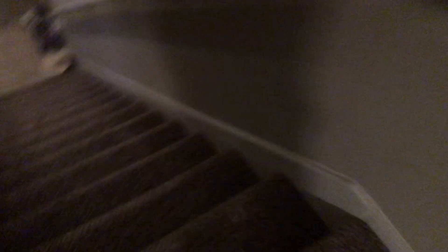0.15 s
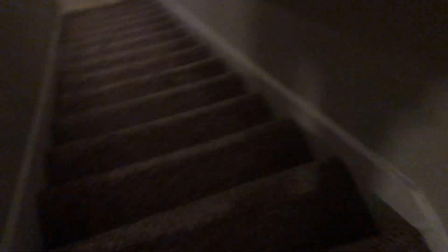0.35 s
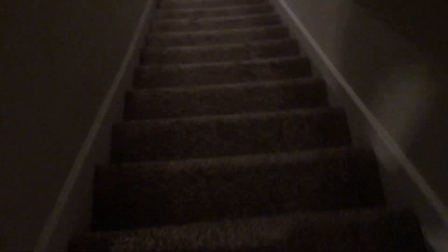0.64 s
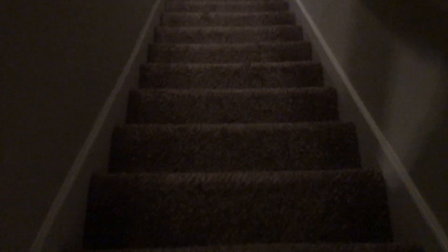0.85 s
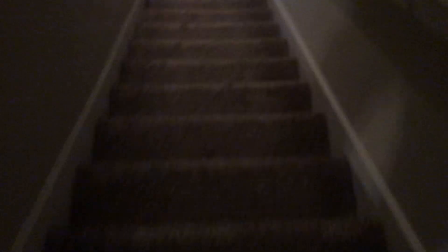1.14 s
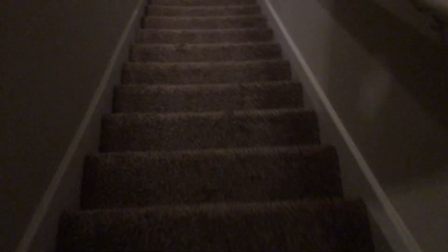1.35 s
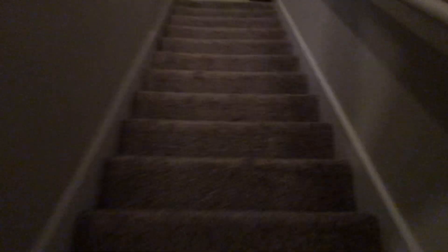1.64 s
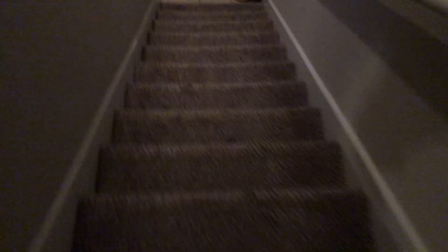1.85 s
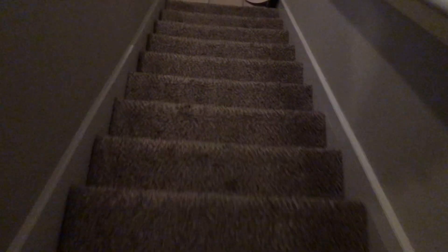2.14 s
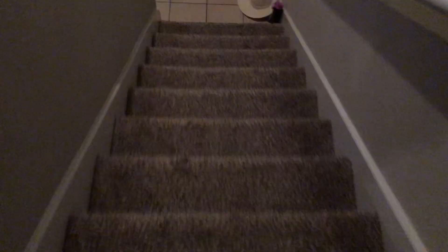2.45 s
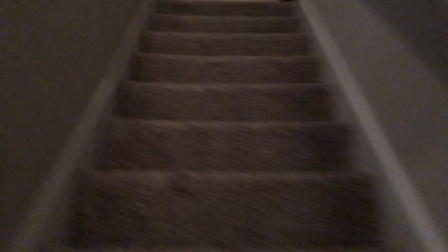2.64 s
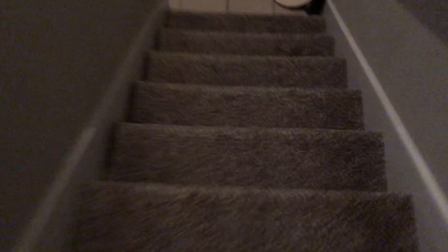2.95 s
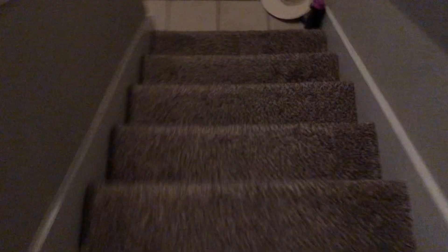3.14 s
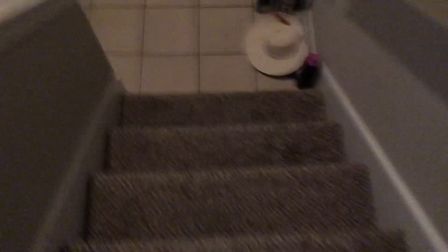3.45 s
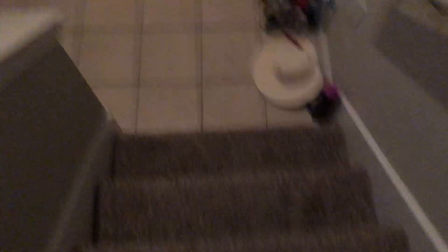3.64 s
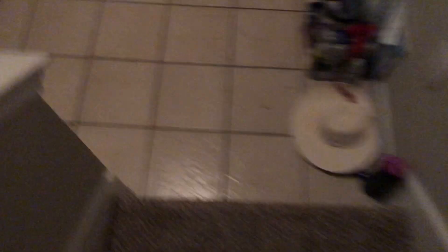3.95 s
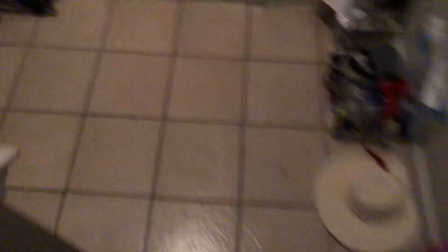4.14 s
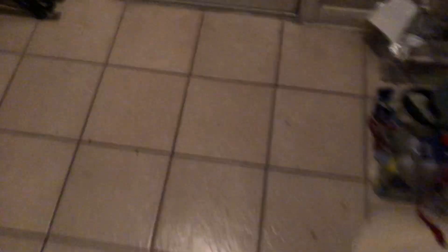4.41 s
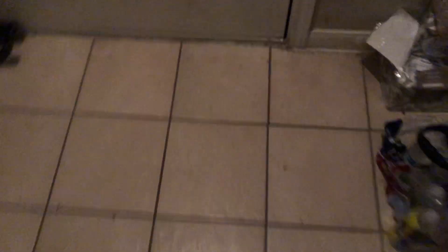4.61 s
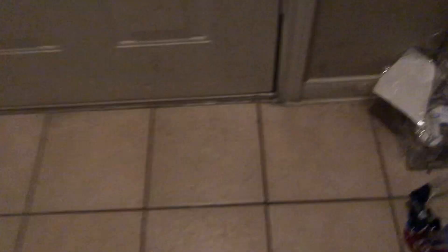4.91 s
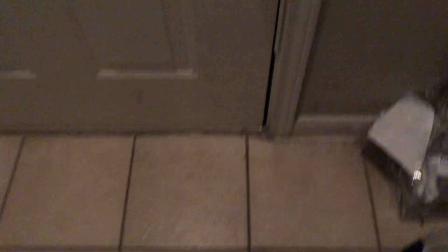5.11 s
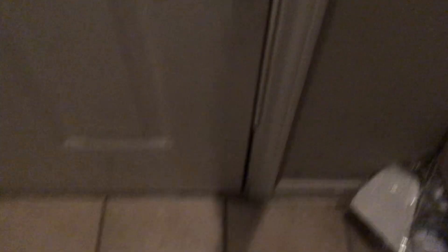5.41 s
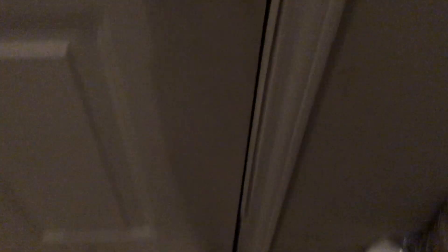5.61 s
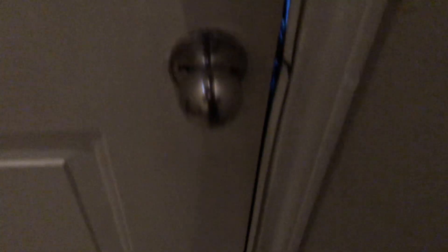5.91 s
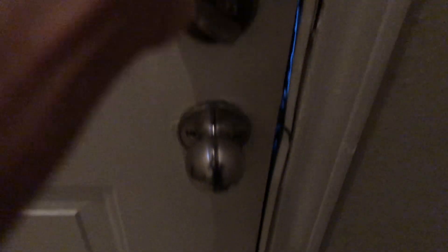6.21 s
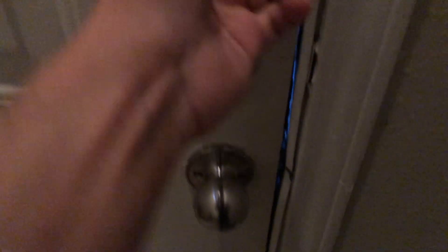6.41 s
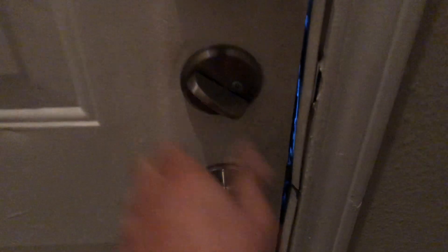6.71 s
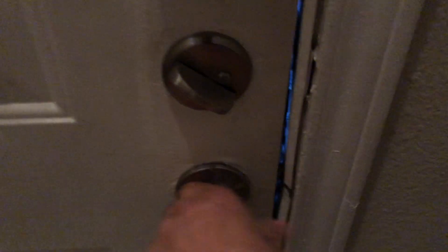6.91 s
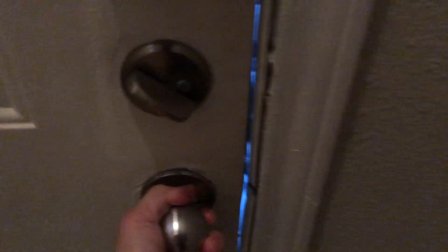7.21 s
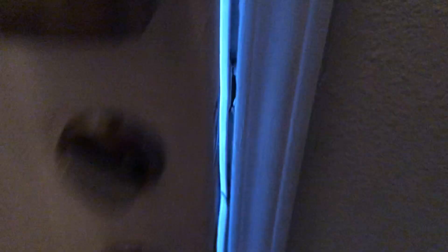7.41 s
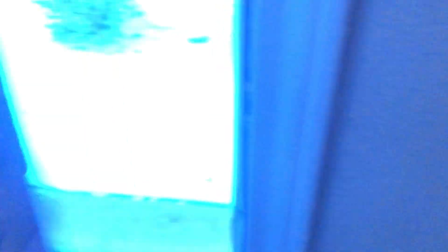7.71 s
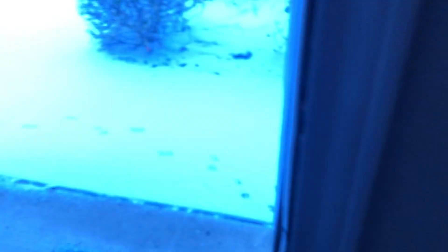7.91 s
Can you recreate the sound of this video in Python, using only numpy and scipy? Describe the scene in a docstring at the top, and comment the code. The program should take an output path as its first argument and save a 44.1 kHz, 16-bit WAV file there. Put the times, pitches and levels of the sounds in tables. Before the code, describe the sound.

Faint indoor air and a fading drone sit under soft steps that grow heavier down carpeted stairs, with hollow low thumps, dull knocks and fabric rustle. The steps turn drier on tile and stop. A hand turns a bolt and knob in crisp clicks; the door jerks loose, by far the loudest moment, crackling and shuddering, then squeaks as it swings. Close microphone, small reverberant hall.

```python
"""Someone walks down carpeted wooden stairs into a tiled hall: treads boom and knock, soles scuff, clothes swish.
Then a deadbolt and knob click, and the front door jerks out of its seal, shudders, squeaks and creaks open.
Wood is swinging sines and dull noise knocks; soles and cloth are coloured noise; metal is brief noise bursts
through lock resonances; seal and hinge are uneven slips through resonances. The hall adds diffuse echoes,
over still indoor air and a fading drone."""
import sys
import numpy as np
from scipy import signal
from scipy.io import wavfile

SR = 44100
rng = np.random.default_rng(int(sys.argv[2]) if len(sys.argv) > 2 else 0)


def put_to_file(sound):
    """Save the sound as 16-bit audio at rate SR, in the file named by the first command-line argument."""
    columns = np.atleast_2d(sound).T  # one column per channel
    safe = np.clip(columns, -1, 1)
    whole_steps = np.round(safe * 32767)
    wavfile.write(sys.argv[1], SR, whole_steps.astype(np.int16))


N = 355446
TIME = np.arange(N) / SR   # s
CUTOFF_HZ = 16200   # top of the recorded band


def from_db(db):
    """Decibels to amplitude."""
    return 10 ** (np.asarray(db) / 20)


def rms_one(x):
    """Scale to an rms of 1."""
    return x / np.sqrt(np.mean(x ** 2) + 1e-20)


def in_time(rows):
    """Columns of a table joined by straight lines over time."""
    s, *columns = np.transpose(rows)
    return [np.interp(TIME, s, column) for column in columns]


def at_hz(points, hz):
    """A spectrum read on a log-frequency axis."""
    point_hz, values = np.array(points).T
    return np.interp(np.log(hz), np.log(point_hz), values)


def add(out, s, sound):
    """Mix a sound in at a given time."""
    start = int(np.clip(s * SR, 0, N - 1))
    out[start:start + len(sound)] += sound[:N - start]


def band(x, low_hz, high_hz):
    """Band-pass."""
    top = min(max(high_hz, low_hz * 1.1), .45 * SR)
    return signal.sosfilt(signal.butter(2, [low_hz, top], "band", fs=SR, output="sos"), x)


def resonate(x, hz, width_hz):
    """One resonance with gain of about 1 at its peak."""
    r = np.exp(-np.pi * width_hz / SR)
    zeros = np.array([1, 0, -1]) * (1 - r * r) / 2
    poles = [1, -2 * r * np.cos(2 * np.pi * hz / SR), r * r]
    return signal.lfilter(zeros, poles, x + 1e-18)


def drift(rate, size):
    """Random values, rate per second, joined by straight lines."""
    knots = rng.standard_normal(4096)
    return np.interp(TIME[:size] * rate, np.arange(len(knots)), knots)


def noise(spectrum, size, t60s=None, patchy_db=0):
    """Half-octave bands of noise, rms 1 at the start; each band may flicker or die at its own rate."""
    white = rng.standard_normal((2, size))   # neighbouring bands take different noise
    edges = 24 * 2 ** np.arange(0, 9.6, .5)   # Hz
    out, power = 0, 0
    for k, (low, high) in enumerate(zip(edges, edges[1:])):
        hz = np.sqrt(low * high)
        level = from_db(at_hz(spectrum, hz)) * np.sqrt(high - low)
        if t60s:
            change_db = -60 * TIME[:size] / at_hz(t60s, hz)
        else:
            change_db = patchy_db * drift(25, size)
        out = out + level * rms_one(band(white[k % 2], low, high)) * from_db(change_db)
        power += level ** 2
    return out / np.sqrt(power)


def contact(low_hz, high_hz, decay_s):
    """A brief contact builds, chatters and dies, with rms about 1 near its start."""
    t = TIME[:SR // 4]
    envelope = np.exp(-t / decay_s) * (1 - np.exp(-t / 0.00055))
    envelope = envelope * from_db(2.2 * drift(850, len(t)))
    burst = band(rng.standard_normal(len(t)) * envelope + 1e-18, low_hz, high_hz)
    return burst * np.sqrt(decay_s * SR / 2 / np.sum(burst ** 2))


def contacts(rows):
    """A run of brief contacts, each in its own band."""
    out = np.zeros(N)
    for s, db, low_hz, high_hz, decay_s in rows:
        add(out, s, from_db(db) * contact(low_hz, high_hz, decay_s))
    return out


def flexing(rows):
    """A wide wooden panel, loaded softly, swings at a low pitch under an even swell and fade."""
    out = np.zeros(N)
    for s, db, hz, half_s in rows:
        near = np.abs(TIME - s) < 4 * half_s
        t = TIME[near] - s
        swell = np.exp(-(t / half_s) ** 2)
        out[near] += from_db(db) * swell * np.cos(2 * np.pi * hz * t)
    return out


def wood_knocks(rows, ring=0., crack_db=-11.5):
    """Struck wood knocks dully around one pitch, partly as a clear ring, with a faint crack on top."""
    out, t = np.zeros(N), TIME[:SR // 4]
    for s, db, hz, decay_s in rows:
        tone = np.sqrt(2) * np.sin(2 * np.pi * hz * t) * np.exp(-t / decay_s)
        dull = contact(hz / 1.79, hz * 1.18, decay_s)
        body = np.sqrt(1 - ring) * dull + np.sqrt(ring) * tone   # ring = share of power in the tone
        crack = contact(hz, hz * 2.35, 0.0043)
        add(out, s, from_db(db) * (body + from_db(crack_db) * crack))
    return out


def footfall_booms():
    """Treads and floor swing under each footfall and rebound."""
    # (time of crest [s], peak [dB], pitch [Hz], half length [s])
    footfall_rows = [(.03, -50.5, 69, 0.074), (.61, -50, 62, 0.017), (1.39, -48, 89, 0.0068),
                     (1.61, -51.5, 72.5, .021), (1.972, -26, 55, 0.021), (2.135, -42, 56.3, 0.011),
                     (2.24, -41.5, 55, 0.027), (2.425, -35, 58, .038), (2.50, -39, 57, 0.015),
                     (2.565, -42, 62, 0.0085), (2.68, -37.5, 57, 0.059), (2.755, -29.5, 53, 0.018),
                     (2.91, -33, 53, 0.019), (3.098, -27.5, 72.4, 0.016), (3.138, -30.5, 63.4, 0.031),
                     (3.215, -36.5, 49.4, 0.034), (3.33, -37, 55.3, 0.039), (3.42, -42, 48, 0.04),
                     (3.765, -34.5, 73, 0.0061), (3.83, -42, 60.4, 0.027), (3.972, -32, 73.5, 0.026),
                     (4.04, -36.5, 76.5, 0.0077), (4.17, -43, 76.5, 0.021), (4.24, -45, 66.4, 0.043)]
    return flexing(footfall_rows)


def tread_knocks():
    """Treads and feet knock; the lower a knock, the more wood moves and the longer it rings."""
    # (time [s], level [dB], pitch [Hz])
    knock_rows = [(1.447, -42.5, 312), (2.221, -37, 527), (2.366, -42, 238), (2.447, -36, 474),
                  (2.467, -44, 765), (2.539, -38, 390), (2.6099, -41.5, 725), (2.635, -43, 248),
                  (2.657, -38, 147), (2.836, -45, 245), (3.004, -40, 607), (3.042, -39, 460),
                  (3.072, -36.5, 157), (3.132, -41, 403), (3.316, -43, 490), (3.352, -36.5, 383),
                  (3.701, -51, 437), (3.736, -43.5, 287), (3.75, -40.5, 139), (3.804, -39.5, 3300),
                  (3.806, -33.5, 1160), (3.807, -35.5, 467), (3.977, -37.5, 1410), (3.956, -40, 142),
                  (3.978, -62, 252), (4.003, -39.5, 755), (4.072, -43.5, 2880), (4.096, -40, 840),
                  (4.16, -39, 154), (4.394, -41, 169.5), (4.426, -41, 880), (4.426, -40.5, 1600),
                  (4.988, -46, 1200), (5.049, -46.5, 660), (5.338, -53, 1210)]
    decay_s, pitch_hz, damping = 0.0047, 500, 0.77   # decay at this pitch, and the power by which it shortens
    rows = [(s, db, hz, decay_s * (pitch_hz / hz) ** damping) for s, db, hz in knock_rows]
    return wood_knocks(rows, ring=.6)


def sole_brushes():
    """Soles brush over carpet and tile in brief bands of noise."""
    # (time [s], level [dB], lowest [Hz], highest [Hz], decay [s])
    brush_rows = [(.408, -58.5, 1090, 3200, 0.068), (3.003, -56, 900, 2800, 0.0067),
                  (3.075, -54.5, 650, 2200, .03), (3.305, -53, 800, 1930, 0.047),
                  (3.812, -49.5, 450, 2800, 0.036), (4.82, -56, 500, 1850, 0.018),
                  (4.925, -58, 2400, 4300, 0.009), (4.988, -50, 850, 4370, 0.026)]
    return contacts(brush_rows)


def on_tile(soles):
    """Hollow treads boom under a scuff; on the solid tiled floor the soles lose their rumble."""
    tile_from_s, tile_cut_hz = 4.55, 260
    tiled = np.clip((TIME - tile_from_s) / .1, 0, 1)
    return (1 - tiled) * soles + tiled * band(soles, tile_cut_hz, CUTOFF_HZ)


def rubbing():
    """Over a steady rub, each scuff bites quickly and fades; each swish swells and falls evenly."""
    # steady rub under the strides, as briskly as the walker moves: (time [s], soles [dB], cloth [dB])
    pace = [(0, -58, -70), (.85, -82, -73), (1.75, -65, -67.5), (2.4, -56.5, -65), (3.1, -56, -62),
            (4.15, -51, -62.5), (4.6, -70, -65.5), (5.5, -64.5, -68), (5.75, -94, -77), (8.06, -85, -81)]
    # a sole lands and slides over the carpet: (time of crest [s], level [dB], fade [s])
    scuff_rows = [(.01, -55.5, 0.053), (.63, -55.5, .08), (1.05, -56.5, 0.079), (1.29, -54.5, 0.11),
                  (1.47, -56.5, 0.067), (1.61, -51.5, 0.031), (1.893, -43.5, 0.04), (2.11, -51, 0.12),
                  (2.24, -54, 0.058), (2.365, -51, 0.024), (2.46, -47, 0.055), (2.845, -48, 0.088),
                  (3.02, -48.5, 0.37), (3.281, -44.5, 0.12), (3.342, -40, 0.036), (3.61, -49.5, 0.017),
                  (3.816, -48.5, 0.067), (3.97, -48.5, 0.065), (4.14, -57, 0.71), (4.425, -48, 0.073),
                  (4.66, -52.5, 0.074), (4.84, -51, 0.062), (5.011, -55, 0.086)]
    # cloth swishes as a leg or arm swings past: (time of crest [s], level [dB], half length [s])
    swish_rows = [(0.08, -62, 0.053), (1.288, -58, 0.053), (1.46, -67, 0.02), (1.62, -62, 0.046),
                  (1.89, -57.5, 0.045), (2.203, -62, 0.073), (2.406, -60, 0.059), (2.67, -63.5, 0.058),
                  (2.878, -57.5, 0.055), (3.09, -60, 0.056), (3.317, -55.5, 0.045), (3.617, -61, 0.027),
                  (3.746, -57, 0.023), (3.936, -57, 0.037), (4.193, -59.5, 0.066), (4.46, -62, 0.057),
                  (4.792, -60.5, 0.025), (5.028, -55.5, 0.029), (5.394, -57.5, 0.037), (5.6, -66, 0.063),
                  (5.89, -61, 0.061), (6.18, -69, 0.077), (6.623, -67.5, 0.019), (6.93, -63.5, 0.062),
                  (7.254, -53, 0.14), (7.5, -57, 0.16), (7.695, -51.5, 0.019), (7.807, -61.5, 0.038)]
    # colour of soles on the floor: (frequency [Hz], density [dB per Hz])
    sole_colour = [(60, 4), (150, 1), (230, 0.5), (360, -3), (700, -9), (1300, -17.5), (2500, -25.5),
                   (5000, -27), (12000, -81)]
    # colour of cloth on cloth: (frequency [Hz], density [dB per Hz])
    cloth_colour = [(300, 1), (1000, -3), (2500, -2.5), (5000, -3.5), (9000, -6), (15000, -7)]
    scuff_rise_s = 0.028
    swish_shape = 3   # 1 = pointed crest, 2 = bell, higher = flatter top
    sole_power, cloth_power = from_db(in_time(pace)) ** 2
    for s, db, fade_s in scuff_rows:
        near = np.abs(TIME - s) < 1
        t = TIME[near] - s
        bite = np.exp(-np.maximum(t / fade_s, -t / scuff_rise_s))
        sole_power[near] += (from_db(db) * bite) ** 2
    for s, db, half_s in swish_rows:
        near = np.abs(TIME - s) < 4 * half_s
        swell = np.exp(-np.abs((TIME[near] - s) / half_s) ** swish_shape)
        cloth_power[near] += from_db(db) ** 2 * swell
    soles = np.sqrt(sole_power) * noise(sole_colour, N, patchy_db=1.8)
    cloth = np.sqrt(cloth_power) * noise(cloth_colour, N, patchy_db=2.0)
    # fine grain in the level of both
    return on_tile(soles) * from_db(1.8 * drift(200, N)) + cloth * from_db(1.9 * drift(300, N))


def chirps():
    """Soles, cloth and rubber chirp as they slide, each in a gliding band of noise."""
    # (time [s], length [s], start [Hz], end [Hz], width [Hz], level [dB])
    chirp_rows = [(3.017, 0.045, 5930, 4400, 180, -60), (3.044, 0.053, 3930, 3180, 350, -63),
                  (3.037, .065, 2500, 1940, 400, -65), (3.551, 0.08, 2140, 3540, 453, -58),
                  (3.554, 0.059, 1750, 1640, 300, -58), (4.91, 0.042, 2220, 2520, 200, -58),
                  (5.2, 0.045, 2390, 2310, 71, -64.5), (5.23, .16, 2380, 2390, 30, -77),
                  (7.307, 0.025, 5320, 2850, 1080, -37), (7.334, .018, 2090, 527, 444, -29)]
    out = np.zeros(N)
    for s, length, start_hz, end_hz, width_hz, db in chirp_rows:
        size = int(length * SR)
        phase = 2 * np.pi * np.cumsum(np.geomspace(start_hz, end_hz, size)) / SR
        voice = drift(width_hz, size) * np.sin(phase) + drift(width_hz, size) * np.cos(phase)
        add(out, s, from_db(db) * np.hanning(size) * voice)
    return out


def lock():
    """Bolt, knob and latch click; each contact rings the lock case."""
    # metal contacts: (time [s], level [dB], lowest [Hz], highest [Hz], decay [s])
    click_rows = [(5.820, -49.5, 400, 4000, 0.012), (5.847, -38.5, 500, 15500, 0.0028),
                  (5.8995, -37.5, 1460, 11600, 0.0023), (5.928, -22, 1400, 8750, 0.0026),
                  (6.0185, -37, 700, 4530, 0.0049), (6.0275, -33, 950, 4400, 0.0045),
                  (6.038, -35.5, 960, 4560, 0.0048), (6.039, -36, 5030, 14000, 0.0025),
                  (6.234, -45, 910, 3000, 0.0042), (6.2425, -35, 1100, 4600, 0.0018),
                  (6.2595, -36.5, 685, 3100, 0.0019), (6.357, -44, 3500, 14500, 0.0023),
                  (6.4465, -25.5, 950, 13800, 0.0035), (6.582, -45, 5270, 14400, 0.00087),
                  (6.657, -40, 700, 15500, 0.0018), (6.712, -52, 2000, 12000, 0.0013),
                  (6.8305, -38, 790, 11300, 0.002), (6.832, -43.5, 704, 2200, 0.0094),
                  (6.940, -45, 453, 1520, 0.017), (6.955, -35, 500, 3030, 0.0027),
                  (7.0372, -36, 690, 4840, 0.0028), (7.055, -39, 700, 3000, 0.0074),
                  (7.069, -31, 750, 5960, 0.006), (7.099, -15.5, 750, 12900, 0.0013),
                  (7.117, -24.5, 500, 6050, 0.011), (7.1475, -15.5, 3700, 13500, 0.0023),
                  (7.161, -21, 900, 7500, 0.0048), (7.1675, -26, 2500, 15000, 0.0026),
                  (7.1705, -32, 700, 6000, 0.0024), (7.2955, -24.5, 1370, 4070, 0.0019),
                  (7.3284, -20, 1300, 4300, 0.0018), (7.355, -20, 1230, 7840, 0.0058),
                  (7.3595, -13, 1410, 4930, 0.0042), (7.3624, -14.5, 2000, 12400, 0.0029),
                  (7.412, -27, 604, 4500, 0.0023), (7.419, -32, 700, 6000, 0.0035),
                  (7.455, -29, 2010, 6960, 0.0092), (7.5516, -25, 700, 8850, 0.0036),
                  (7.570, -26, 600, 4970, 0.019), (7.577, -22, 1500, 14900, 0.0054),
                  (7.581, -10.5, 740, 14100, 0.0027), (7.605, -26, 450, 2500, 0.0038),
                  (7.837, -43, 1520, 7000, 0.0026), (7.8835, -40, 900, 7500, 0.0036)]
    # resonances of the lock case: (frequency [Hz], width [Hz], gain [dB])
    case_modes = [(847, 200, 0), (1300, 260, -2), (1900, 130, -3), (2280, 70, -7), (2680, 110, -6),
                  (3180, 110, -6), (3720, 160, -2), (5600, 240, -6), (7500, 200, -6), (10250, 300, -7)]
    clicks = contacts(click_rows)
    case = sum(from_db(db) * resonate(clicks, hz, width) for hz, width, db in case_modes)
    return 0.5 * clicks + case


def pings():
    """Springs, pins and plates ring on for a moment as fading sines."""
    # small parts left ringing by a contact: (time [s], level [dB], pitch [Hz], time to fall 60 dB [s])
    ping_rows = [(5.847, -36.5, 7540, 0.018), (5.847, -43.5, 780, 0.041), (5.928, -29, 3600, 0.018),
                 (5.928, -36, 1890, 0.026), (6.028, -34.5, 2040, 0.0386), (6.262, -42, 5700, 0.016),
                 (6.448, -36, 1884, 0.024), (6.657, -41.5, 7460, 0.022), (6.831, -30.5, 3120, 0.0086),
                 (6.657, -42.5, 937, 0.044), (7.148, -14, 10250, 0.009), (7.363, -13, 11000, 0.0086),
                 (7.359, -15, 1925, 0.025), (7.366, -24, 2290, 0.05), (7.581, -19, 1265, 0.014),
                 (7.638, -31, 3402, 0.12), (7.636, -33, 10200, .04), (7.93, -56, 3445, .3)]
    out, t = np.zeros(N), TIME[:SR // 4]
    for s, db, hz, t60 in ping_rows:
        add(out, s, from_db(db - 60 * t / t60) * np.sin(2 * np.pi * hz * t))
    return out


def hand_thuds():
    """Bolt, knob or latch presses on the leaf, which answers dully."""
    # (time [s], level [dB], pitch [Hz], decay [s])
    thud_rows = [(5.825, -52, 252, 0.16), (5.93, -41, 480, 0.0084), (6.03, -42, 230, 0.017),
                 (6.04, -45.5, 112, 0.04), (6.259, -49.5, 614, 0.011), (6.447, -50, 150, 0.058),
                 (6.657, -51, 276, 0.046), (6.832, -45.5, 251, 0.046), (6.942, -47, 138, 0.098),
                 (6.945, -41.5, 497, 0.045), (7.492, -32.5, 520, 0.017), (7.582, -31, 636, 0.0052),
                 (7.599, -38, 603, 0.0083)]
    return wood_knocks(thud_rows)


def uneven_sizes(spread_db, surge_db=0):
    """Random sizes and signs for a stream of slips or ticks, a few much stronger than the rest."""
    sizes_db = spread_db * np.minimum(rng.exponential(1, N), 3) + surge_db
    return from_db(sizes_db) * rng.choice([-1, 1], N)


def chatter(ticks_per_s=170):
    """Knob spindle and latch rattle in their play: fine, uneven ticks that die away."""
    # loose parts chatter after a hard contact: (time [s], level [dB], decay [s])
    chatter_rows = [(6.02, -46, 0.018), (7.10, -40, 0.028), (7.15, -36, 0.022), (7.365, -37.5, 0.05),
                    (7.585, -48, 0.039)]
    level = np.zeros(N)
    for s, db, decay_s in chatter_rows:
        level += from_db(db) * (TIME > s) * np.exp(-np.abs(TIME - s) / decay_s)
    ticks = (rng.random(N) < ticks_per_s / SR) * uneven_sizes(spread_db=3)
    tick_sound = contact(1300, 11000, 0.000053)
    return level * rms_one(signal.fftconvolve(ticks, tick_sound)[:N])


def seal(slips_per_s=1400, surges_per_s=130):
    """The seal lets go in ragged surges of uneven slips, each ringing the door's edge and frame."""
    # the rubber seal peels from the frame: (time [s], crackle [dB])
    peel = [(7.33, -44), (7.365, -28.5), (7.385, -27.5), (7.42, -36), (7.435, -32), (7.455, -39),
            (7.49, -44), (7.56, -42), (7.62, -72)]
    # resonances of edge and frame: (frequency [Hz], width [Hz], gain [dB])
    edge_modes = [(430, 94, -9), (585, 75, 10.5), (915, 40, 9), (1350, 170, 3), (2220, 530, 3.5),
                  (2650, 580, 0.5), (3230, 190, 4), (3900, 340, 0), (4640, 330, -13), (8000, 4400, -33)]
    peel_db, = in_time(peel)
    sizes = uneven_sizes(spread_db=2.5, surge_db=2.5 * drift(surges_per_s, N))
    slips = sizes * (rng.random(N) < slips_per_s / SR)
    crackle = rms_one(sum(from_db(db) * resonate(slips, hz, width) for hz, width, db in edge_modes))
    peeling = (TIME > peel[0][0]) * (TIME < peel[-1][0])
    return from_db(peel_db) * crackle * peeling


def door_leaf():
    """Each blow sets the leaf rattling: a few clear modes among many dense ones, heard as noise."""
    # blows that shake the leaf: (time [s], level [dB])
    blow_rows = [(5.931, -46), (6.03, -47.5), (6.25, -46.5), (6.447, -45), (6.659, -52), (6.833, -48),
                 (7.10, -31), (7.116, -36), (7.172, -28.5), (7.358, -21), (7.411, -24.5), (7.585, -37)]
    # colour of the dense modes: (frequency [Hz], density [dB per Hz])
    leaf_colour = [(25, -24), (45, 1), (80, 6.5), (190, 0.5), (350, 1.5), (600, 3), (1000, -2.5),
                   (2000, -2.5), (4000, 2), (7000, -8), (16000, -16)]
    # their decay: (frequency [Hz], time to fall 60 dB [s])
    leaf_t60 = [(60, 0.64), (300, 0.78), (1000, 0.33), (3000, 0.026), (12000, 0.054)]
    # clear modes: (frequency [Hz], level [dB])
    leaf_modes = [(246, -20.5), (345, -17.5), (439, -28), (464, -13.5), (590, -14.5), (707, -19),
                  (903, -24)]
    ring_s = .42   # time for the clear modes to fall 60 dB
    out, t = np.zeros(N), TIME[:SR]
    for s, db in blow_rows:
        modes = sum(from_db(level) * np.sin(2 * np.pi * hz * t) * rng.choice([-1, 1])
                    for hz, level in leaf_modes)
        ringing = modes * from_db(-60 * t / ring_s)
        onset = 1 - np.exp(-t / 0.00063)
        add(out, s, from_db(db) * (noise(leaf_colour, SR, leaf_t60) + ringing) * onset)
    return out


def door_flex():
    """The freed leaf flexes with a low swing."""
    # (time of crest [s], peak [dB], pitch [Hz], half length [s])
    flex_rows = [(7.36, -36.5, 108, 0.004), (7.445, -35, 48.6, 0.073), (7.465, -32.5, 83.5, 0.094),
                 (7.492, -28.5, 121, 0.017), (7.535, -44, 83, 0.025)]
    return flexing(flex_rows)


def squeaks():
    """Dry metal sticks and slips at an arching, unsteady pitch; rough slips add a rasp."""
    # (time [s], length [s], base pitch [Hz], arch of pitch [octaves], level [dB],
    #  fall per harmonic [dB], roughness [0-1])
    squeak_rows = [(7.126, 0.013, 1240, 0.3, -20, 22, 0.04), (7.142, 0.012, 1370, 0.12, -22.5, 24, 0.1),
                   (7.152, 0.026, 1400, 0.03, -32, 12, 0.5), (7.634, 0.016, 3390, 0.006, -32.5, 4.5, 0.08),
                   (7.909, 0.032, 3440, 0.025, -51, 5.5, 0.025),
                   (7.996, 0.018, 2100, -0.02, -45.5, 6, 0.05)]
    out, harmonics = np.zeros(N), np.arange(1, 6)[:, None]
    for s, length, hz, arch, db, fall_db, rough in squeak_rows:
        size = int(length * SR)
        swell = np.sin(np.linspace(0, 1, size) * np.pi).clip(0)
        pitch = hz * 2 ** (arch * swell + 0.56 * rough * drift(605, size))
        phase = 2 * np.pi * np.cumsum(pitch) / SR
        partials = np.sin(harmonics * phase) * from_db(-fall_db * (harmonics - 1))
        rasp = 2.0 * rough * rms_one(band(rng.standard_normal(size), 480, 3400))
        add(out, s, from_db(db) * np.sqrt(swell) * (partials.sum(axis=0) + rasp))
    return out


def hinge(slip_s=0.0007, jitter=.75, count=200):
    """The hinge pin slips at very uneven intervals, and each slip rings hinge and frame."""
    # the dry hinge grinds as the door swings wide: (time [s], level [dB])
    grind = [(8.009, -74), (8.014, -39), (8.032, -37.5), (8.045, -43.5), (8.06, -36)]
    # resonances of hinge and frame: (frequency [Hz], width [Hz], gain [dB])
    hinge_modes = [(980, 123, 5.5), (1270, 130, 2.5), (1440, 150, 1.5), (2070, 360, -3), (3400, 800, -10.5),
                   (4150, 470, -5.5), (4640, 280, -6), (5400, 260, -12.5), (7940, 860, -23)]
    grind_db, = in_time(grind)
    start_s = grind[0][0]
    times = start_s + np.cumsum(slip_s * np.exp(jitter * rng.standard_normal(count)))
    slips = np.bincount((times * SR).astype(int), minlength=N)[:N]
    creak = sum((-1) ** k * from_db(db) * resonate(slips, hz, width)   # neighbours in opposite sign
                for k, (hz, width, db) in enumerate(hinge_modes))
    return from_db(grind_db) * creak / np.std(creak[TIME > start_s])


def hall(x):
    """Diffuse echoes of the hard walls and floor, building up within a few milliseconds."""
    # decay of the hall: (frequency [Hz], time to fall 60 dB [s])
    hall_t60 = [(100, 0.7), (500, 0.62), (2000, 0.51), (5000, 0.45), (10000, 0.19), (16000, 0.28)]
    # colour of the echoes: (frequency [Hz], density [dB per Hz])
    hall_colour = [(60, 2), (300, 7), (1500, 3), (4000, -1.5), (8000, 0), (16000, -3.5)]
    tail = noise(hall_colour, SR, hall_t60) * (1 - np.exp(-TIME[:SR] / 0.00048))
    return signal.fftconvolve(x, tail / np.sqrt(np.sum(tail ** 2)))[:N]


def lock_echoes(count=4):
    """The lock radiates a different fine spectrum towards each wall; its echoes add to a smooth hiss."""
    return sum(hall(lock()) for _ in range(count)) / np.sqrt(count)


def house():
    """Still air as coloured noise, with a faint ventilation drone that is left behind upstairs."""
    # background air, quieter in the hall until the door opens: (time [s], level [dB])
    air = [(1.0, -58), (4.2, -62), (5.5, -60.5), (7.5, -59.5), (7.9, -54)]
    # colour of still air indoors: (frequency [Hz], density [dB per Hz])
    air_colour = [(25, -16), (50, -3), (80, 0.5), (145, -1), (260, -14.5), (380, -5), (520, -15),
                  (900, -16.5), (1400, -25), (2500, -26.5), (6000, -33), (16000, -54)]
    air_db, = in_time(air)
    hum = rms_one(resonate(rng.standard_normal(N), 370, 32))
    drone = hum * from_db(-64.0) / (1 + (TIME / 1.57) ** 4)   # halved after 1.57 s
    return from_db(air_db) * noise(air_colour, N) + drone


def scene():
    """Near sounds straight to the microphone, their echoes from the hall, and the air of the house."""
    wood = tread_knocks() + hand_thuds() + sole_brushes()
    booms = footfall_booms() + door_flex()
    rattle, leaf = chatter() + seal(), door_leaf()
    tones = squeaks() + chirps() + pings() + hinge()
    to_hall = from_db(-11.0) * wood + from_db(-10.5) * rattle + from_db(-23.5) * leaf
    to_hall = to_hall + from_db(-16) * booms + from_db(-15) * tones
    metal = lock() + from_db(-7.5) * lock_echoes()
    near = wood + metal + rattle + tones + leaf + booms + rubbing()
    return (near + hall(to_hall) + house())[None]


def record(dry):
    """The microphone loses the deepest bass; the top is cut."""
    thin = signal.sosfilt(signal.butter(4, 30, "high", fs=SR, output="sos"), dry)
    return signal.sosfilt(signal.ellip(10, .2, 80, CUTOFF_HZ, fs=SR, output="sos"), thin)


dry = scene()
out = record(dry)
put_to_file(out)
```